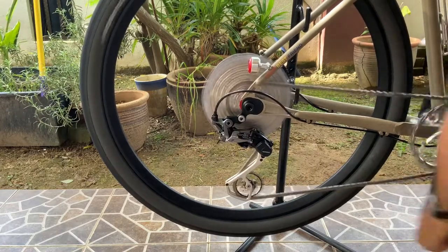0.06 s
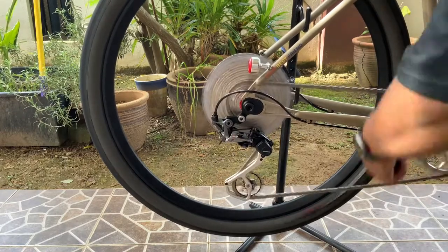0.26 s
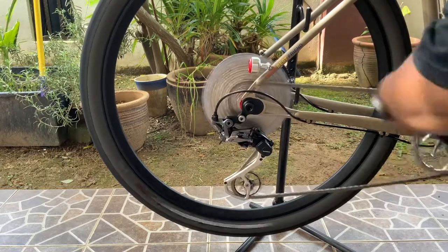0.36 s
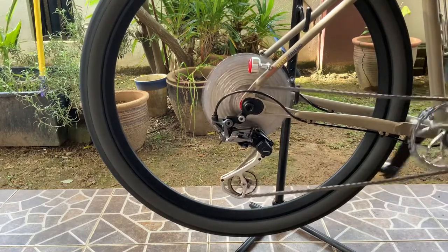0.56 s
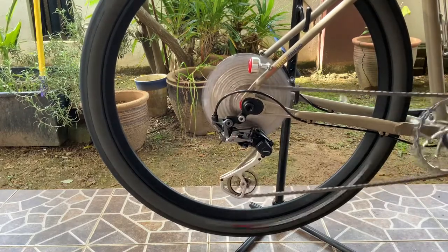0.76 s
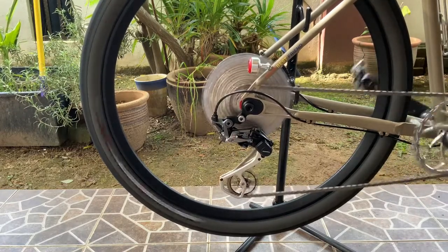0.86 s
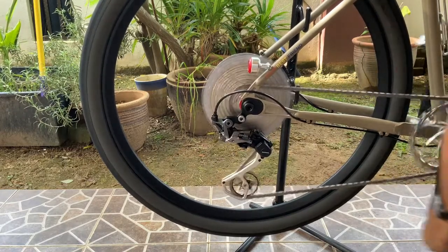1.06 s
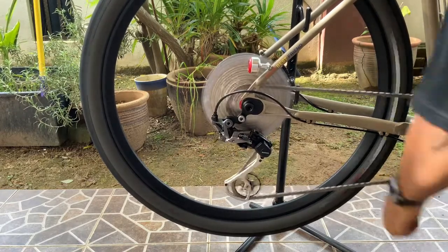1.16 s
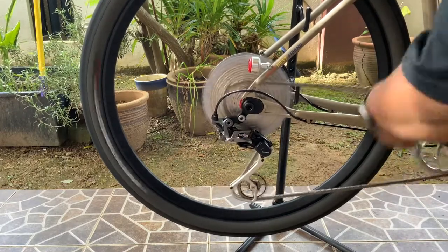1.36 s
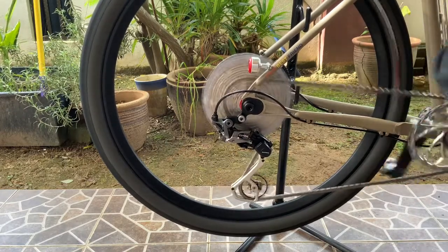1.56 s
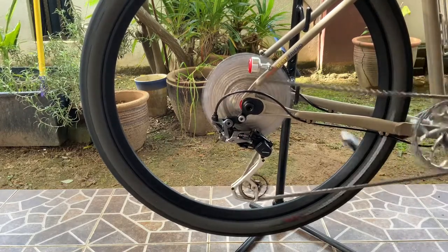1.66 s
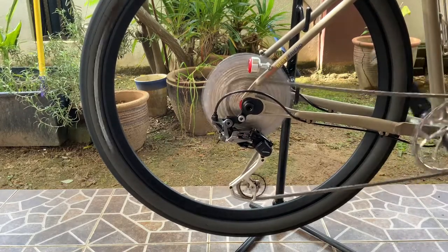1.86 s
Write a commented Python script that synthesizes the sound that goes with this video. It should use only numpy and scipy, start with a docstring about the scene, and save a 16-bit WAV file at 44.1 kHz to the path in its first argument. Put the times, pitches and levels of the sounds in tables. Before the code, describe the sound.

A bicycle chain ticks over the sprockets, pedalled by hand on a stand outdoors. It rasps and snaps into gear early, clatters through another shift midway and snaps again near the end, close by, over a faint low rumble.

```python
"""A bicycle chain ticks and snaps through gear shifts, pedalled by hand on a stand outdoors.
Links tick as they seat on the sprockets. At each shift the rear derailleur drags the chain sideways
with a rasp and it snaps onto new teeth, setting the cassette and the frame ringing.
The derailleur cage knocks, a pulley pings and the rollers sizzle.
A low hum, a few soft thuds and outdoor rumble lie underneath."""
import sys
import numpy as np
from scipy import signal
from scipy.fft import rfft, irfft
from scipy.io import wavfile

SR = 44100
rng = np.random.default_rng(int(sys.argv[2]) if len(sys.argv) > 2 else 0)


def dump(signal):
    """Clip the signal to [-1, 1] and save it as 16-bit WAV at the path in sys.argv[1]."""
    limited = np.clip(np.atleast_2d(signal).T, -1, 1)
    pcm = np.round(limited * 32767).astype(np.int16)
    wavfile.write(sys.argv[1], SR, pcm)


N = 83790
T = np.arange(N) / SR
GRID_HZ = np.maximum(np.fft.rfftfreq(2 * N, 1 / SR), 1)
DIRECT_ONLY = np.array([[1], [0]])  # sources have two rows: direct sound, diffuse sound
SNAP_RISE_S, TICK_FALL_S = 0.00045, 0.0019

# EQ of steel snapping onto a tooth: (frequency [Hz], gain [dB])
SNAP_EQ = [(200, -17), (1000, -20), (1950, -12.5), (3000, -16), (4300, -13.5), (6000, -3.5), (7000, -7),
           (8300, 1.5), (9500, -4), (12000, -0.5), (15000, 1.5), (16500, -13)]
# EQ of a light metal tick: (frequency [Hz], gain [dB])
TICK_EQ = [(200, -15), (1500, -15.5), (4000, -8.5), (6000, 0), (15000, -0.5), (16500, -4.5)]


def chain_on_teeth():
    """Ticks and snaps strike the steel: the cassette rings, links and spokes jingle, a crack follows."""
    # cassette mode clusters: (frequency [Hz], relative level [dB])
    cassette_modes = [(8100, -2), (10750, 4.5), (11750, 3.5), (12850, -3), (14600, -8), (15350, -24)]
    ticks, snaps = link_ticks(), chain_snaps()
    hits = ticks + snaps
    drive = from_db(-0.5) * ticks + from_db(-1.5) * snaps
    cassette = body_response([(hz, db, 0.28) for hz, db in cassette_modes], spread=0.02)
    ring = from_db(-24) * resonate(drive, cassette)
    rattle = from_db(-10) * jingle(drive, t60=0.25)
    crack = from_db(-9) * resonate(hits, decay(rng.standard_normal(N), t60=0.04))
    return hits + ring + rattle + crack


def chain_snaps():
    """The chain drops onto new teeth: each snap is a burst of grit with a pitched clink."""
    # (time [s], level [dB], hold [s], treble tilt [dB/octave], clink pitch [Hz], clink over snap [dB])
    snap_hits = [(0.0923, -33, 0.0018, -1, 8780, -6), (0.1844, -28, 0.00047, -1, 8500, -5.5),
                 (0.2113, -23, 0.0014, 0.5, 12900, -6.5), (0.3949, -17, 0.00085, 3, 8780, -2.5),
                 (0.3973, -17.5, 0.0013, 3, 14630, 1), (.966, -28, 0.0025, -3, 6100, 0),
                 (1.005, -26.5, 0.0068, -1.5, 10100, -10), (1.0116, -18, 0.0029, 2, 14450, -18),
                 (1.057, -23, 0.0039, -2.5, 10220, -10), (1.1004, -25, 0.0054, -1.5, 13400, -19),
                 (1.1435, -33.5, 0.0066, -3, 8080, -12), (1.189, -16.5, 0.0016, 1, 6150, -10),
                 (1.4073, -37.5, 0.0042, -.5, 6440, -10.5), (1.578, -33.5, 0.0017, -3.5, 8000, -6),
                 (1.6389, -22, 0.0016, -1.5, 8000, -3.5)]
    texture, snaps = grit(grain_db=2.0), np.zeros((2, N))
    for start, db, hold, tilt, clink_hz, clink_db in snap_hits:
        burst = texture * envelope(start, hold, SNAP_RISE_S, fall_s=0.0013)
        snaps += from_db(db) * equalise(burst, SNAP_EQ, tilt)
        snaps[0] += clink(start, db + clink_db, clink_hz, hold, fall_s=0.00079)
    return snaps


def link_ticks():
    """Links seat on the teeth, each with a tick and a clink at a pitch of its own."""
    # (time [s], level [dB])
    link_hits = [(0.043, -46), (.1155, -39.5), (0.178, -35.5), (0.267, -44.5), (0.326, -49), (0.55, -43),
                 (.6265, -46), (0.679, -44), (0.7291, -41), (0.7801, -43.5), (0.803, -47.5), (.833, -42),
                 (0.86, -44), (.884, -44.5), (0.9334, -37), (1.078, -30.5), (1.139, -30.5), (1.184, -27),
                 (1.216, -37), (1.324, -39.5), (1.3635, -39), (1.383, -40), (1.4265, -38), (1.447, -44.5),
                 (1.49, -44.5), (1.6177, -35), (1.6361, -28), (1.6617, -36), (1.7341, -39), (1.774, -42),
                 (1.7925, -41), (1.8135, -45), (1.855, -42.5), (1.874, -38)]
    ticks = equalise(grit_bursts([(start, db, 0.0011) for start, db in link_hits]), TICK_EQ)
    pitches_hz = rng.uniform(5700, 11740, len(link_hits))
    for (start, db), hz in zip(link_hits, pitches_hz):
        ticks[0] += clink(start, db - 6.5, hz, hold=0, fall_s=TICK_FALL_S)
    return ticks


def jingle(drive, t60):
    """Loose links and spokes rattle on with the energy of each blow, fading over t60 seconds."""
    feedback = from_db(-60 / (t60 * SR)) ** 2
    energy = signal.lfilter([1 - feedback], [1, -feedback], drive[0] ** 2)
    return equalise(np.sqrt(energy + 1e-20) * grit(grain_db=0.5), SNAP_EQ)


def rasps_and_frame():
    """The chain scrapes across the cassette and the turning drivetrain drones; both shake the frame."""
    # sideways scrapes: (time [s], level [dB], hold [s], relative frame shake [dB])
    scrapes = [(0.049, -39.5, 0.0071, -0.5), (0.2002, -43.5, 0.0055, 2.5), (0.392, -42.5, 0.0064, -3),
               (.944, -38, 0.02, -14), (1.012, -35, 0.019, -3), (1.058, -37.5, 0.0058, 4),
               (1.115, -46, 0.004, 10), (1.186, -39, 0.01, 1), (1.547, -40, 0.0055, -23),
               (1.637, -39, 0.0054, 1.5)]
    # tone of the scraping: (frequency [Hz], gain [dB])
    rasp_eq = [(300, -6), (700, -4.5), (1500, -0.5), (3000, 5.5), (4500, -1.5), (8000, -0.5), (16000, -8.5)]
    # swell of the drivetrain drone: (time [s], level [dB])
    drone_levels = [(0, -66), (.5, -56), (.72, -69), (.95, -69), (1.33, -50), (1.48, -59.5), (1.7, -52),
                    (1.9, -60.5)]
    # tone of the drone: (frequency [Hz], gain [dB])
    drone_eq = [(120, -41), (200, 0), (400, 2), (560, -8), (1200, -17)]
    # frame and wheel modes: (frequency [Hz], relative level [dB], t60 [s])
    frame_modes = [(205.7, -2.5, 0.12), (244.3, -5.5, 0.41), (292.5, -1, 0.39), (384, -8, 0.39),
                   (1033, 0.5, 0.071)]
    shape = dict(rise_s=0.0012, fall_s=0.039, grain_db=1.5)
    rasp = grit_bursts([(start, db, hold) for start, db, hold, _ in scrapes], **shape)
    shake = grit_bursts([(start, db + lift, hold) for start, db, hold, lift in scrapes], **shape)
    drone = equalise(fader(drone_levels) * rng.standard_normal((2, N)), drone_eq)
    drive = from_db(-15.5) * shake + from_db(-20) * drone
    frame = resonate(drive, body_response(frame_modes, spread=0.04))
    return equalise(rasp, rasp_eq) + drone + frame


def cage_knocks():
    """The derailleur cage knocks with a short midrange ring."""
    # (time [s], level [dB], pitch [Hz])
    knocks = [(1.0125, -43, 820), (1.058, -40, 1027), (1.306, -49.5, 1015), (1.412, -54, 998),
              (1.639, -40.5, 791)]
    return DIRECT_ONLY * sum(clink(start, db, hz, hold=0, fall_s=0.015) for start, db, hz in knocks)


def pulley_pings():
    """A derailleur pulley pings once a turn for three turns: a gritty tick with a short ring."""
    # (time [s], level [dB])
    ping_hits = [(0.5391, -46), (0.694, -46), (.848, -44)]
    pings = equalise(grit_bursts([(start, db, 0) for start, db in ping_hits]), TICK_EQ)
    pings[0] += sum(clink(start, db, hz=5800, hold=0, fall_s=0.002) for start, db in ping_hits)
    return pings


def roller_sizzle():
    """The rollers of the running chain make a fine sizzle that swells and sinks."""
    # (time [s], relative level [dB])
    sizzle_levels = [(0, -53.5), (.1, -47.5), (.65, -54.5), (.92, -56.5), (1.3, -47), (1.52, -52),
                     (1.7, -48.5), (1.9, -51.5)]
    # tone of the rollers: (frequency [Hz], gain [dB])
    sizzle_eq = [(400, 0), (1000, 1), (3000, -11), (6000, -1.5), (15000, -1), (16500, -35)]
    return from_db(-4.5) * equalise(fader(sizzle_levels) * grit(grain_db=4.5), sizzle_eq)


def soft_thuds():
    """Dull bumps, each a low tone under a bell-shaped envelope."""
    # (time [s], level [dB], pitch [Hz], half-width [s])
    bumps = [(0.343, -41, 68.6, 0.02), (0.475, -44, 403, 0.0065), (0.581, -32, 69.4, 0.0096),
             (1.205, -42.5, 222, 0.015)]
    thuds = np.zeros(N)
    for centre, db, hz, width in bumps:
        bell = np.exp(-((T - centre) / width) ** 2)
        thuds -= from_db(db) * bell * np.cos(2 * np.pi * hz * (T - centre))
    return DIRECT_ONLY * thuds


def low_hum(waver=0.13):
    """A low tone and its octave, wavering in phase and level."""
    # (frequency [Hz], level [dB])
    partials = [(70.5, -58), (141, -60.5)]
    hum = np.zeros(N)
    for hz, db in partials:
        tone = np.sin(2 * np.pi * hz * T + waver * drift(rate_hz=7.4))
        hum += from_db(db) * unit_rms(tone * (1 + waver * drift(rate_hz=8.9)))
    return DIRECT_ONLY * hum


def outdoor_rumble():
    """A steady bed of bass-heavy noise."""
    # (frequency [Hz], gain [dB])
    rumble_eq = [(20, -20), (55, -0.5), (100, 1), (160, -12), (400, -14.5), (600, -24), (2500, -31),
                 (16000, -45)]
    return from_db(-52.5) * equalise(rng.standard_normal((2, N)), rumble_eq)


def clink(start, db, hz, hold, fall_s):
    """One struck resonance: it sounds while the contact lasts, then dies away."""
    tone = np.sqrt(2) * np.sin(2 * np.pi * hz * (T - start))
    return from_db(db) * tone * envelope(start, hold, SNAP_RISE_S, fall_s)


def grit(grain_db):
    """Countless tiny metal contacts of uneven strength, direct and diffuse."""
    return unit_rms(rng.standard_normal((2, N)) * from_db(grain_db * drift(rate_hz=1200)))


def grit_bursts(rows, rise_s=0.00011, fall_s=TICK_FALL_S, grain_db=2.5):
    """A burst of grit for each (time [s], level [dB], hold [s]); sharp ticks by default."""
    power = sum((from_db(db) * envelope(start, hold, rise_s, fall_s)) ** 2 for start, db, hold in rows)
    return np.sqrt(power + 1e-20) * grit(grain_db)


def body_response(rows, spread):
    """Ringing modes (frequency [Hz], level [dB], t60 [s]), each smeared into a narrow cluster."""
    response = np.zeros(N)
    for hz, db, t60 in rows:
        warped_time = T + spread * np.cumsum(drift(rate_hz=247.0)) / SR
        response += from_db(db) * decay(np.sin(2 * np.pi * hz * warped_time), t60)
    return response


def resonate(x, response):
    """Play x through a body."""
    return signal.fftconvolve(x, np.atleast_2d(response), axes=-1)[:, :N]


def envelope(start, hold, rise_s, fall_s):
    """Exponential attack, hold, exponential release."""
    return np.exp(np.minimum(T - start, 0) / rise_s - np.maximum(T - start - hold, 0) / fall_s)


def decay(x, t60):
    """Fade x by 60 dB every t60 seconds and scale it to unit energy."""
    return unit_rms(x * from_db(-60 * T / t60)) / np.sqrt(N)


def fader(points):
    """A gain ride through (time [s], level [dB]) points."""
    return from_db(np.interp(T, *np.transpose(points)))


def equalise(x, points, tilt=0):
    """Shape white sound and keep its power; tilt adds dB per octave above 1 kHz."""
    octaves = np.log2(np.maximum(GRID_HZ, 1000) / 1000)
    gain = from_db(frequency_curve(points) + tilt * octaves)
    return irfft(rfft(x, 2 * N) * unit_rms(gain))[..., :N]


def frequency_curve(points):
    """Join (frequency [Hz], value) points on a log axis."""
    hz, value = np.transpose(points)
    return np.interp(np.log(GRID_HZ), np.log(hz), value)


def drift(rate_hz):
    """A smooth random wander of unit rms."""
    return unit_rms(np.interp(T * rate_hz, np.arange(N), rng.standard_normal(N)))


def from_db(db):
    """Decibels to gain."""
    return 10 ** (np.asarray(db) / 20)


def unit_rms(x):
    """Scale to unit rms."""
    return x / np.sqrt(np.mean(x ** 2) + 1e-20)


def scene():
    """Mix all sources and spread them in stereo, frequency by frequency."""
    # phase between the sides: (frequency [Hz], left lead [rad])
    left_lead = [(350, .1), (700, 1.9), (1050, 1.7), (1500, .6), (2070, -2), (3100, -3.5), (4000, -6.1),
                 (6400, -6.2), (7200, -5.6), (7900, -6.28), (11000, -6.3), (15000, -6.9)]
    # stereo balance: (frequency [Hz], left over right [dB])
    balance = [(60, -1.4), (130, -0.5), (290, -5.5), (700, 0), (1500, -5), (3000, -1), (7000, -1),
               (15000, 0.5)]
    # stereo width: (frequency [Hz], diffuse share of the power [0-1])
    width = [(100, 0.0075), (1200, 0.39), (2500, 0.061), (15000, 0.0075)]
    bicycle = chain_on_teeth() + rasps_and_frame() + cage_knocks() + pulley_pings() + roller_sizzle()
    background = soft_thuds() + low_hum() + outdoor_rumble()
    direct, diffuse = rfft(bicycle + background, 2 * N)
    share = np.clip(frequency_curve(width), 0, 1)
    sides = np.array([[1], [-1]])  # left, right
    stereo = np.sqrt(1 - share) * direct + sides * np.sqrt(share) * diffuse
    pan = from_db(sides * frequency_curve(balance) / 2)
    phase_shift = np.exp(1j * sides * frequency_curve(left_lead) / 2)
    return irfft(pan * phase_shift * stereo)[:, :N]


def record(dry):
    """A steep low-pass removes the very top."""
    stopband_hz = 16700
    return signal.sosfilt(signal.cheby2(16, 60, stopband_hz, fs=SR, output="sos"), dry)


dry = scene()
out = record(dry)
dump(out)
```